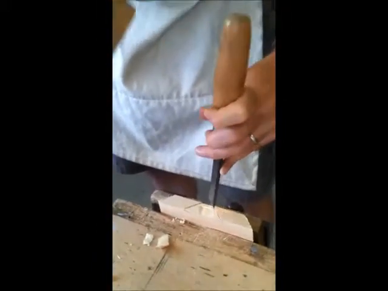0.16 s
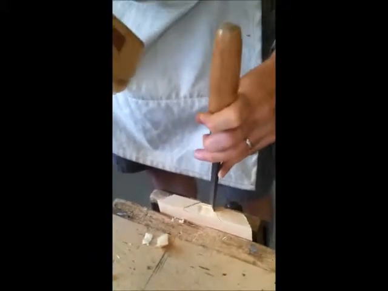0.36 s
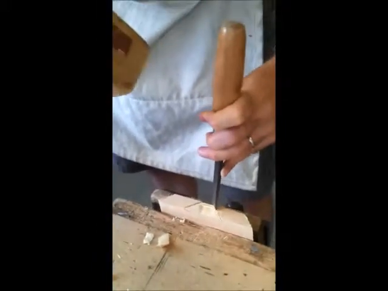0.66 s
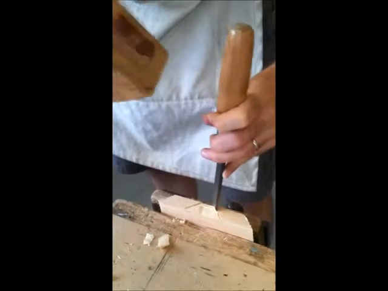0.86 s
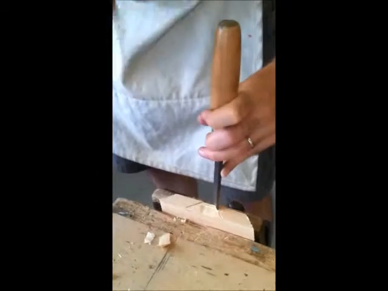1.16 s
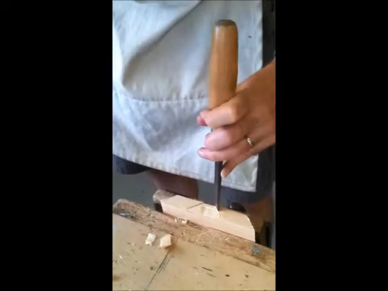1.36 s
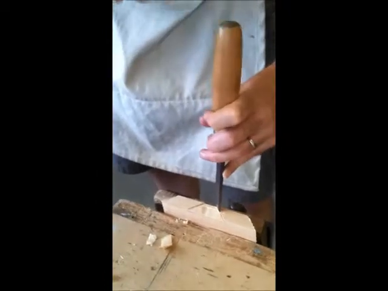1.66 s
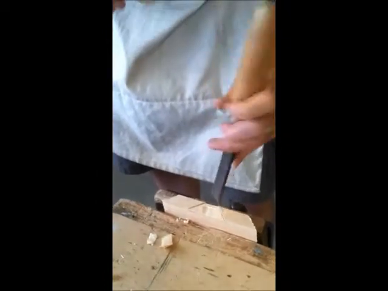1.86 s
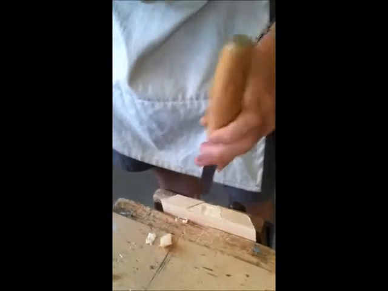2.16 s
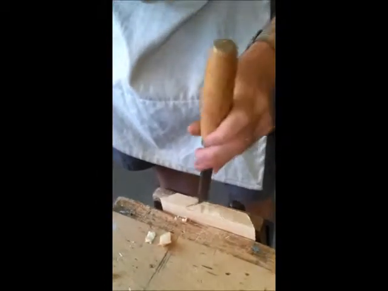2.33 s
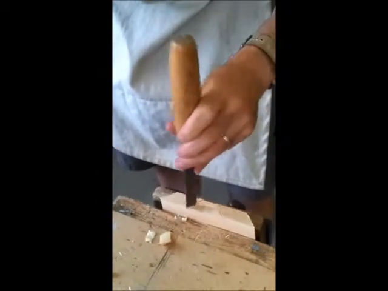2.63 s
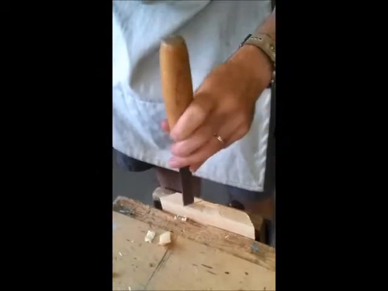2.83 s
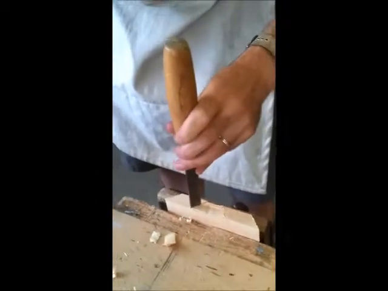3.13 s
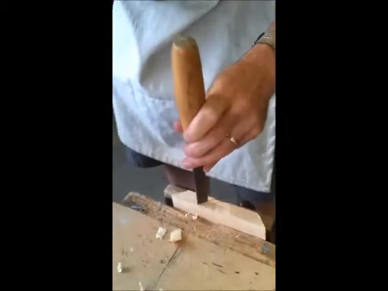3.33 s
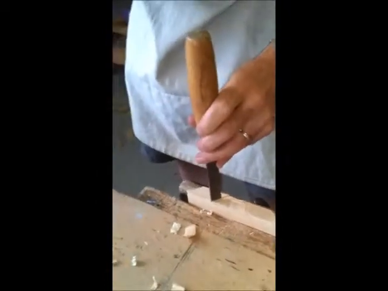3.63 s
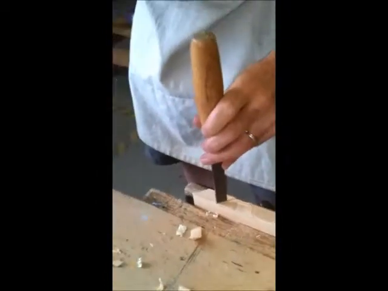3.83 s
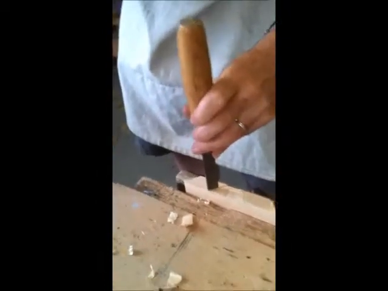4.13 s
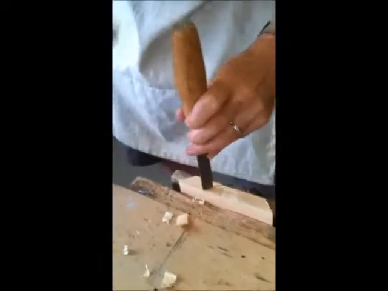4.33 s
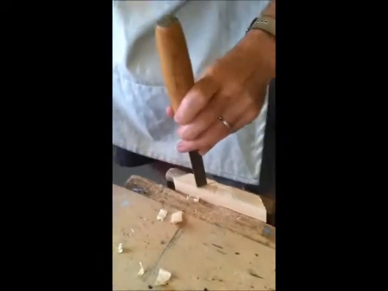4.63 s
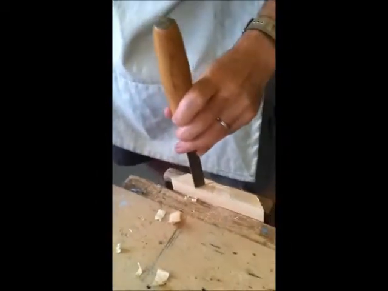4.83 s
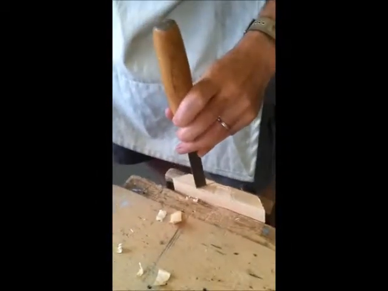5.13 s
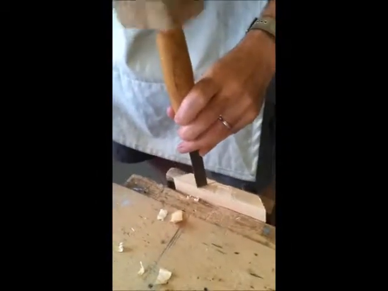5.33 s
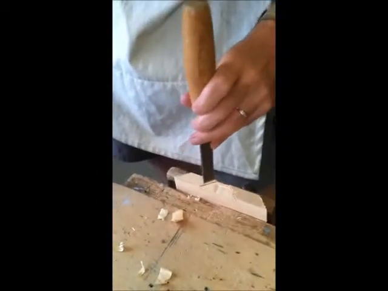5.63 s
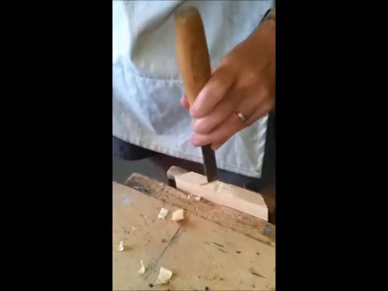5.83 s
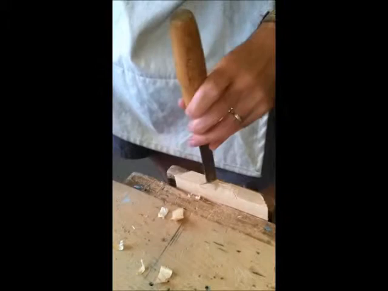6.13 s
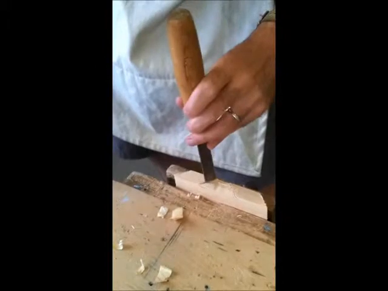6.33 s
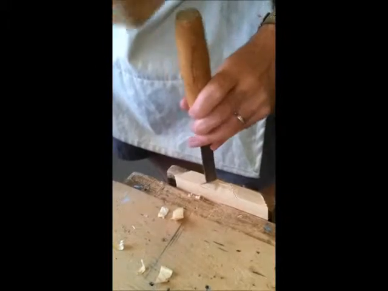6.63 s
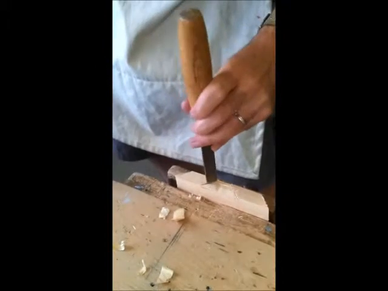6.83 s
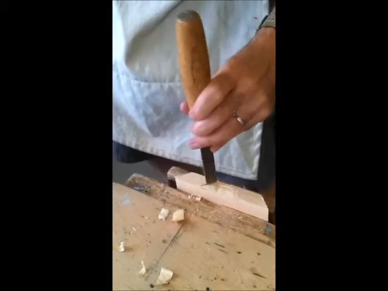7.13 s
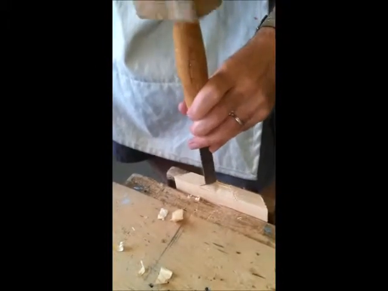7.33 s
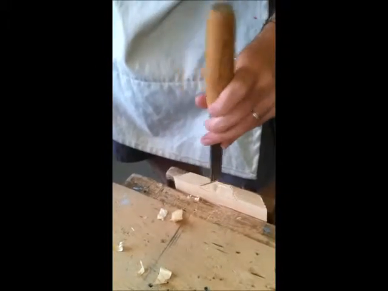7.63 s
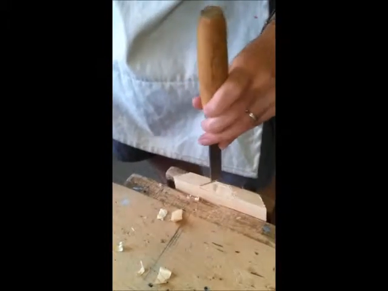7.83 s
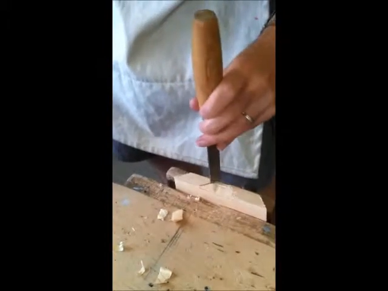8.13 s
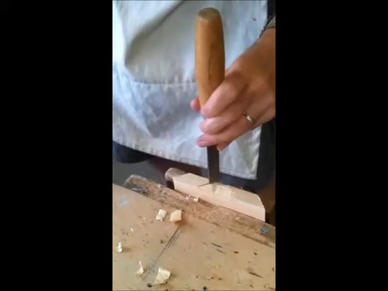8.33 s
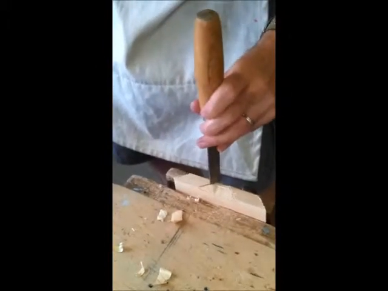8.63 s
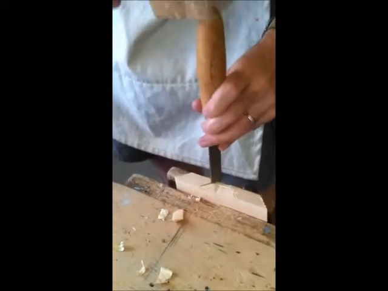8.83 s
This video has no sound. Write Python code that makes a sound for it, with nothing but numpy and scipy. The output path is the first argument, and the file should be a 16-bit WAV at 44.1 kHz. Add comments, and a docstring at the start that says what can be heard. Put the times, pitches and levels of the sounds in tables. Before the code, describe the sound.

Loud, clipped knocks of mallet on chisel come in twos and threes, with faint steel ring, splitting wood and quiet pauses between.

```python
"""Mallet and chisel at a workbench

A mallet drives a chisel into a block of wood, two or three blows at a time, in a small live workshop.
Each blow is a pulse shaped by the resonances of wood and bench, with dying sines for the steel blade.
The two hardest blows split the wood. Between blows come soft bumps and scuffs, over a steady hush.
The microphone is so close that the blows overload it: they are turned down and clipped."""
import sys
import numpy as np
from scipy import signal
from scipy.fft import rfft, irfft
from scipy.io import wavfile

SR = 44100
rng = np.random.default_rng(int(sys.argv[2]) if len(sys.argv) > 2 else 0)


def dump_mix(stems):
    """Bounce the given channels to the path in sys.argv[1] as a 16-bit WAV at rate SR."""
    frames = np.atleast_2d(stems).T  # one column per channel
    limited = np.clip(frames, -1, 1)  # hard clip at full scale
    pcm = np.round(limited * 32767).astype(np.int16)
    wavfile.write(sys.argv[1], SR, pcm)


N = 396018
TAPS = 8192  # length of a pulse in samples, before padding
HZ = np.fft.rfftfreq(TAPS, 1 / SR)


def mallet(bench_width_hz=140, block_width_hz=280, handle_width_hz=180, overtone_ratio=1.32):
    """Each blow knocks the wood; as the cut deepens the handle rings less and the blade more."""
    # mallet blows: t/s, strength/dB, brightness/(dB per octave), depth of the cut (0-1),
    # bench pitch/Hz, block pitch/Hz, handle pitch/Hz
    blows = [(-.16, 29, 0, .3, 345.3, 994, 2610), (0.2205, 27.5, -0.38, 0.37, 336.4, 987, 2682),
             (1.7692, 22.5, 0.4, 0, 440, 1209, 2438), (2.0628, 27, 0.15, 0, 317, 890, 2320),
             (5.2084, 25.5, -0.1, 0.01, 321, 839, 2287), (5.5479, 28.5, -0.34, 0.68, 310, 1035, 2460),
             (5.8705, 32.5, 0.55, 0.92, 571.3, 855, 2533), (7.5009, 28, 0.18, 0.51, 420, 824, 2330),
             (7.8558, 33, 0.53, 0.92, 440, 1094, 2034)]
    # the first blow after a pause seats the edge with a dry knock; those that follow rattle the work:
    # time for the clatter to fall 60 dB/s, bench resonance/dB, block resonance/dB
    opening_blow = (.036, 2.8, 7.3)
    following_blow = (.09, 1.5, 3.2)
    pause_s = .6
    # how loud each part rings: at the surface/dB, at full depth/dB
    handle_db = (13, 1)
    handle_overtone_db = (6, -1)
    blade_db = (-29.5, -7)
    blade_overtones_db = (-36.5, -11.5)
    # colour of mallet, handle and block struck together: f/Hz, level/dB
    wood_colour = [(30, -25.5), (90, -20), (160, -9), (300, -0.5), (520, -4), (850, 2.5), (1800, -0.5),
                   (3000, -2), (4600, -10.5), (6400, -13), (8600, -15.5), (11000, -27.5), (15000, -36)]
    # resonances of bench, block and mallet: f/Hz, width/Hz, lift/dB
    wood_modes = [(129, 6.7, 7), (325, 17, 2), (412.7, 53, 2), (559, 10, 5.5), (650, 44, 5),
                  (797.2, 27, 3.5), (826, 130, 2), (1100, 60, 0.5), (1496, 82, 4), (1653, 90, 5.5),
                  (1862, 42, 4.5), (2700, 35, 1), (3390, 300, -3), (4010, 580, 4.5), (4800, 68, 1.5),
                  (5560, 230, 0)]
    # main modes of the steel blade: f/Hz, relative level/dB, time to fall 60 dB/s
    blade_modes = [(3900, -9, .12), (4030, -9, 0.2), (4150, -10, 0.27), (7570, -2.5, 0.068),
                   (7620, -3, 0.12), (7630, 3, 0.15)]
    # its highest pair of modes: f/Hz, relative level/dB, time to fall 60 dB/s
    blade_overtones = [(12310, -3, .11), (12345, -1, .15)]

    out = np.zeros((2, N))
    last_s = -np.inf
    for s, db, bright, depth, bench_hz, block_hz, handle_hz in blows:
        after_pause = s - last_s > pause_s
        clatter_t60, bench_db, block_db = opening_blow if after_pause else following_blow
        last_s = s
        grip = [(bench_hz, bench_width_hz, bench_db),
                (block_hz, block_width_hz, block_db),
                (handle_hz, handle_width_hz, at_depth(handle_db, depth)),
                (handle_hz * overtone_ratio, handle_width_hz, at_depth(handle_overtone_db, depth))]
        knock = impact(read(wood_colour, HZ) + lift(wood_modes) + lift(grip) + tilt(bright))
        wood = workshop(knock, near_t60=clatter_t60, room_db=-6.0, crack_db=-3.5)
        steel = amp(at_depth(blade_db, depth)) * blade(blade_modes)
        steel += amp(at_depth(blade_overtones_db, depth)) * blade(blade_overtones)
        add(out, s, amp(db) * (wood + steel))
    return out


def blade(modes):
    """The steel radiates sideways, so its note arrives mostly by way of the walls; unit energy."""
    note = workshop(ring(modes, size=2 * TAPS), near_t60=0.03, room_db=5.5, crack_db=-12)
    return note / np.linalg.norm(note)


def splitting():
    """A short crunch as the chip gives way."""
    # fibres split just after the two hardest blows: t/s, level/dB
    splits = [(5.921, 17), (7.938, 10.5)]
    # colour of the crunch: f/Hz, level/dB
    split_colour = [(100, -23.5), (700, 7.5), (2000, -7), (4300, -9), (5450, 1), (6300, -11.5), (8500, -13),
                    (14000, -48.5)]

    out = np.zeros((2, N))
    for s, db in splits:
        crunch = impact(read(split_colour, HZ))
        add(out, s, amp(db) * workshop(crunch, near_t60=0.066, room_db=-9.5, crack_db=-17.0))
    return out


def placing(grains_per_s=900):
    """Soft bumps are single pulses; scuffs are many small random ones, as the edge is put in place."""
    # the chisel edge is set on the block: t/s, level/dB, brightness/(dB per octave)
    bumps = [(0.8412, -14, -2.5), (1.203, -23, 0), (4.273, -1, 1.5), (4.285, -11.5, 6), (6.56, -26, -6.5),
             (6.826, -24.5, -4), (8.489, -22, -8.5)]
    # colour of a bump: f/Hz, level/dB
    bump_colour = [(40, -32), (150, -6), (400, 0), (620, -11.5), (1100, -6.5), (1900, -14.5), (2700, -20.5),
                   (4000, -31), (8000, -43.5), (15000, -70)]
    # resonances heard in a bump: f/Hz, width/Hz, lift/dB
    bump_modes = [(395, 84, 4), (1029, 170, 7.5), (1315, 140, 4), (2540, 260, 10)]
    # the edge scuffs over the grain: t/s, length/s, level/dB
    scuffs = [(0.959, 0.036, -25), (1.009, 0.046, -26), (3.572, 0.032, -36.5), (3.957, 0.024, -32),
              (4.716, 0.0087, -28.5)]
    # colour of a scuff: f/Hz, level/dB
    scuff_colour = [(100, -11), (400, -3.5), (800, -9.5), (1300, -2), (1700, -3.5), (2500, -13),
                    (4500, -16), (6500, -10), (14000, -24)]

    out = np.zeros((2, N))
    for s, db, bright in bumps:
        bump = impact(read(bump_colour, HZ) + lift(bump_modes) + tilt(bright))
        add(out, s, amp(db) * workshop(bump, near_t60=0.092, room_db=-3.0, crack_db=-15))
    t = np.arange(TAPS) / SR
    for s, length, db in scuffs:
        stroke = np.sin(np.pi * np.minimum(t / length, 1))  # rises and falls once
        caught = rng.random(TAPS) < grains_per_s / SR
        grains = stroke * rng.standard_normal(TAPS) * caught
        grains /= np.linalg.norm(grains) + 1e-9
        scuff = signal.fftconvolve(grains, impact(read(scuff_colour, HZ)))
        add(out, s, amp(db) * workshop(scuff, near_t60=0.057, room_db=-1.5, crack_db=-9.5))
    return out


def loose_tool(start_s=7.8561, level_db=-43, pitch_hz=450, t60_s=2):
    """Shaken by the last blow, a loose tool on the bench hums faintly: one slowly dying sine."""
    out = np.zeros((2, N))
    hum = ring([(pitch_hz, level_db, t60_s)], size=2 * SR)
    add(out, start_s, np.tile(hum, (2, 1)))
    return out


def workshop(sound, near_t60, room_db, crack_db, crack_t60=0.035,
             build_s=0.0075, echo_s=0.041, echo_width_s=0.0044, echo_db=3):
    """First crack and clatter off the bench top, then the room, with a stronger return from a far wall."""
    # time for the room to fall 60 dB: f/Hz, time/s
    room_t60 = [(100, 1), (250, 0.71), (600, 0.47), (1500, 0.49), (4000, 0.51), (8000, 0.51), (14000, 0.43)]
    # colour of the room: f/Hz, level/dB
    room_colour = [(40, -8), (150, -0.5), (300, 4), (600, 0.5), (2500, 0), (6000, -1), (14000, 0.5)]

    t = np.arange(SR) / SR
    clatter = amp(-60 * t / near_t60)
    clatter /= np.linalg.norm(clatter)
    crack = amp(-60 * t / crack_t60)
    crack *= amp(crack_db) / np.linalg.norm(crack)
    near = noise_pair(SR) * np.hypot(clatter, crack)
    # the tail is noise in which each frequency dies at its own pace
    hz, age, z = signal.stft(noise_pair(SR), SR, nperseg=512)
    decay_db = -60 * age / read(room_t60, hz)[:, None]
    z = z * amp(read(room_colour, hz)[:, None] + decay_db)
    tail = signal.istft(z, SR)[1][:, :SR]
    tail *= 1 - np.exp(-t / build_s)  # reflections take time to build up
    tail *= amp(echo_db * np.exp(-((t - echo_s) / echo_width_s) ** 2))
    tail /= np.linalg.norm(amp(-60 * t / read(room_t60, 1000)))
    return signal.fftconvolve(sound[None], near + amp(room_db) * tail, axes=1)


def hush(level_db=-58, slope_db=-0.5):
    """The still air of the workshop: steady low noise with a thin hiss."""
    # colour of the still air: f/Hz, relative level/dB
    air_colour = [(15, -55), (25, -28), (59, -7.5), (121, -1), (219, -6.5), (243, -10.5), (394, -11),
                  (427, -11.5), (749, -15), (2180, -18), (2560, -19.5), (6720, -22.5), (13800, -19),
                  (15000, -32)]

    hz = np.fft.rfftfreq(N, 1 / SR)
    colour_db = read(air_colour, hz) + np.interp(hz, HZ, tilt(slope_db))
    air = irfft(rfft(noise_pair(N)) * amp(colour_db), N)
    return amp(level_db) * air / air.std()


def noise_pair(size):
    """White noise at two microphones, most alike near 300 Hz, with left and right level set by pitch."""
    # how alike the two sides are: f/Hz, left-right correlation
    likeness = [(30, 0.018), (120, 0.28), (300, 0.77), (600, .5), (1200, 0.053), (3000, 0.0063),
                (14000, 0.014)]
    # how much louder the left is than the right: f/Hz, difference/dB
    left_lead = [(60, -0.5), (200, 4.5), (500, 3), (1200, 2), (2200, 4.5), (4000, 2.5), (8000, -1.5),
                 (13000, .5)]

    hz = np.fft.rfftfreq(size, 1 / SR)
    mid, side = rfft(rng.standard_normal((2, size)))
    same = read(likeness, hz)
    mid = mid * np.sqrt((1 + same) / 2)
    side = side * np.sqrt((1 - same) / 2)
    lead = amp(read(left_lead, hz) / 2)
    return irfft(np.array([(mid + side) * lead, (mid - side) / lead]), size)


def impact(colour_db):
    """A pulse of unit energy with the given spectrum, packed as early as it can be (minimum phase)."""
    cepstrum = irfft(np.log(amp(colour_db)))
    cepstrum[1:TAPS // 2] *= 2  # fold the backward half onto the forward half
    cepstrum[TAPS // 2 + 1:] = 0
    pulse = irfft(np.exp(rfft(cepstrum)))
    return np.pad(pulse / np.linalg.norm(pulse), (0, TAPS))


def ring(modes, size):
    """Freely dying sines, each with its pitch, level and time to fall 60 dB."""
    t = np.arange(size) / SR
    return sum(amp(db - 60 * t / t60) * np.sin(2 * np.pi * hz * t) for hz, db, t60 in modes)


def lift(modes):
    """Bell-shaped resonances in dB."""
    return sum(db / (1 + (2 * (HZ - hz) / width) ** 2) for hz, width, db in modes)


def tilt(db_per_octave):
    """A slope about 1 kHz, level below 250 Hz: a harder contact is shorter, and so brighter."""
    return db_per_octave * np.log2(np.maximum(HZ, 250) / 1000)


def at_depth(ends, depth):
    """A value between the surface of the block (0) and the full depth of the cut (1)."""
    surface, deep = ends
    return surface + (deep - surface) * depth


def amp(db):
    """Decibels to gain."""
    return 10 ** (np.asarray(db) / 20)


def read(points, hz):
    """Joins (Hz, value) points on a log-frequency axis."""
    f, value = np.transpose(points)
    return np.interp(np.log(hz + 1), np.log(f + 1), value)


def add(mix, s, sound):
    """Mixes a stereo sound in at time s; what falls outside the mix is cut off."""
    start = round(s * SR)
    sound = sound[:, max(-start, 0):]
    part = mix[:, max(start, 0):][:, :sound.shape[1]]
    part += sound[:, :part.shape[1]]


def scene():
    """Everything that reaches the two microphones."""
    return mallet() + splitting() + placing() + loose_tool() + hush()


def limiter(x, threshold_db, attack_s, share, recover_db_per_s):
    """Turns loud sound down, too late for the first crack, and comes back up during the echo."""
    pole = np.exp(-1 / (attack_s * SR))
    power = signal.lfilter([1 - pole], [1, -pole], (x ** 2).mean(0))
    power_db = 10 * np.log10(power + 1e-12)
    # hold each peak, then let it fall at a steady rate
    fall = np.arange(N) * recover_db_per_s / SR
    held_db = np.maximum.accumulate(power_db + fall) - fall
    over_db = np.maximum(held_db - threshold_db, 0)
    smooth_over_db = signal.lfilter([1 - pole], [1, -pole], over_db)
    return x * amp(-share * smooth_over_db)


def record(dry, ceiling=.94, edge_hz=14900):
    """Limiter, overload of the input, removal of the top treble, and full scale."""
    limited = limiter(dry, threshold_db=-2.5, attack_s=0.0035, share=0.44, recover_db_per_s=100.5)
    clipped = np.clip(limited, -ceiling, ceiling)
    low_pass = signal.firwin(255, edge_hz, window=("kaiser", 8), fs=SR)
    return np.clip(signal.oaconvolve(clipped, low_pass[None], "same", axes=1), -1, 1)


dry = scene()
out = record(dry)
dump_mix(out)
```